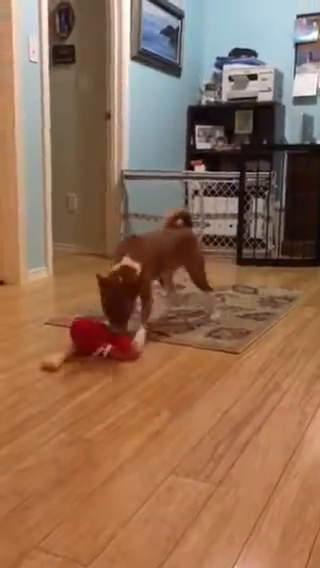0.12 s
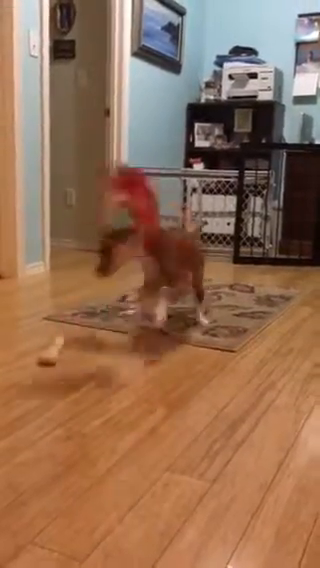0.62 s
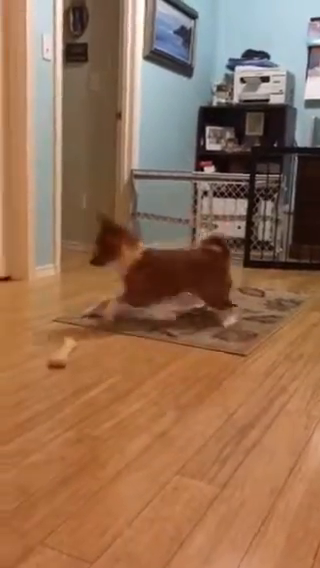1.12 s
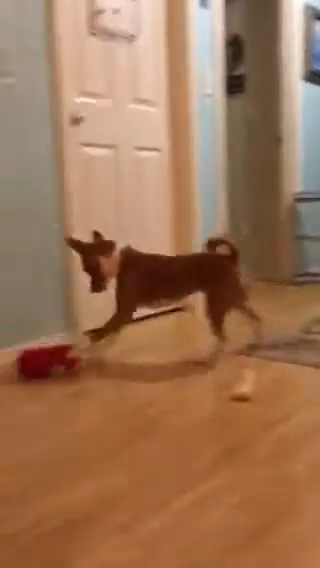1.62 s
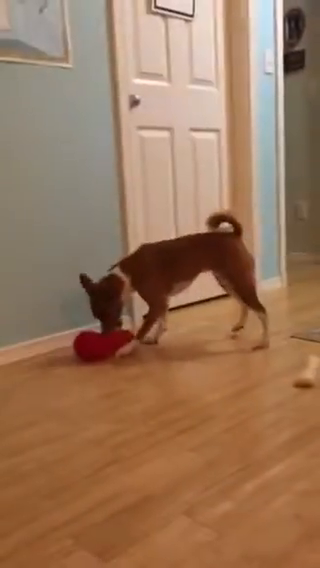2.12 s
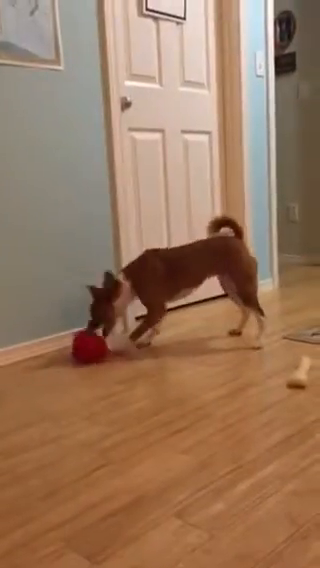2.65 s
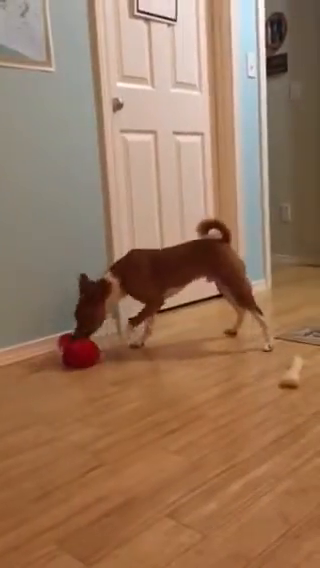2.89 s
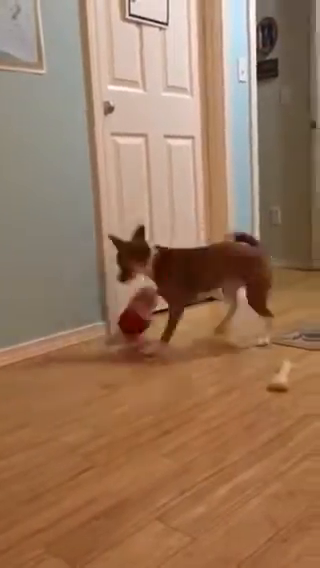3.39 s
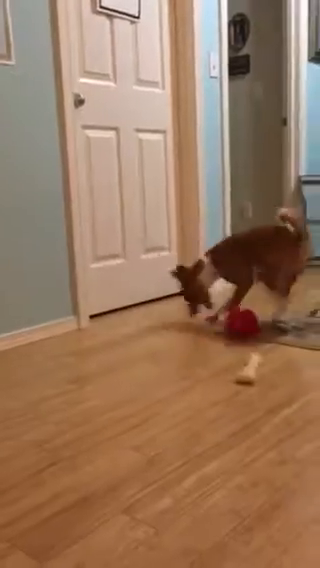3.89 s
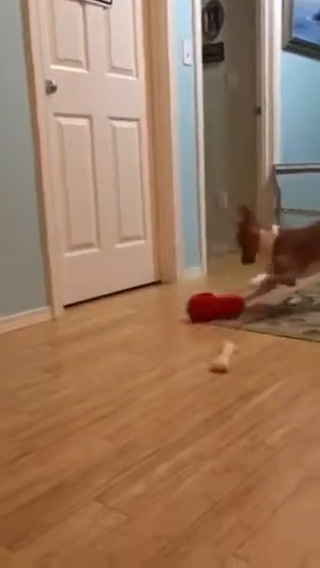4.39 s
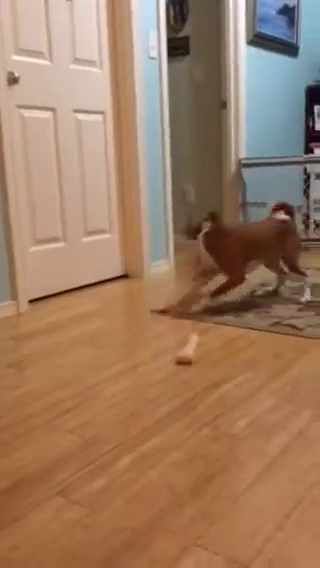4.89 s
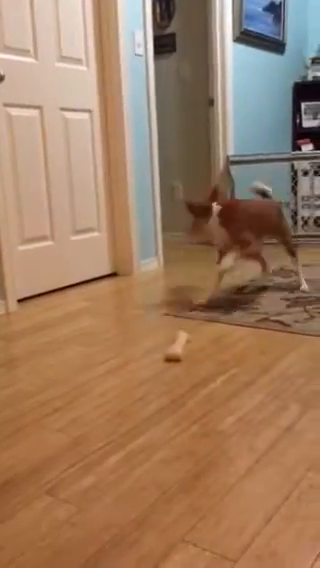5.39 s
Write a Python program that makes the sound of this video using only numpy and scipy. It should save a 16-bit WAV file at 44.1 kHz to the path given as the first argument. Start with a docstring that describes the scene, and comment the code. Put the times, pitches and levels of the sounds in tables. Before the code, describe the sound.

A dog tosses a soft toy on a laminate floor, heard by a phone a few metres away. Scattered claw ticks and dull thumps open the scene, low booms follow around 1.4 seconds, then a quiet lull. A loud burst of sharp clicks, thuds and scuffing comes just after three seconds, thinning into sparse taps and soft bumps. The bare room adds a bright short tail; faint hiss and low hum sit behind.

```python
"""Claws of a dog tick on a laminate floor as it tosses a soft toy about, a few metres from a phone.
Each tick is bright scattered noise with a brief ring, and the bare room's hard walls stretch its tail.
Pads and toy thump into decaying low floor modes; paws and plush scuff along as swelling grainy noise.
Small hollow plops are short wobbly tones. Behind it all lie shaped-noise hiss and a wavering hum."""
import sys
import numpy as np
from scipy import signal
from scipy.fft import rfft, irfft
from scipy.io import wavfile
from scipy.ndimage import uniform_filter1d

SR = 44100
rng = np.random.default_rng(int(sys.argv[2]) if len(sys.argv) > 2 else 0)


def boost(x):
    """Linear amplitude factor 10**(x/20) for a level x in decibels (scalar or array-like)."""
    u = np.asarray(x, float) / 20
    return 10 ** u


def transcribe(u):
    """Save the signal u as a 16-bit wav file named by the first command-line argument.

    u: samples, shape (n,) or (channels, n), limited to [-1, 1]; the rate is SR.
    q: integer samples, one column per channel.
    """
    v = np.clip(np.atleast_2d(u).T, -1, 1)
    q = np.round(v * 32767).astype(np.int16)
    wavfile.write(sys.argv[1], SR, q)


N = 243873  # length in samples

# Claw ticks. Each row: time in seconds, nominal peak in dB, centre of the bright hump in Hz,
# treble lift above 4 kHz in dB per octave, room tail lift in dB.
CLAW_TICKS = [(0.212, -54, 7500, 11, -6), (0.343, -37.5, 2500, 1, 0.5), (0.3494, -34, 4260, 10, -10),
              (0.5272, -37, 1650, 20, -15.5), (0.6483, -36, 2500, -6, -10), (0.6519, -19, 1970, 2.5, -0.5),
              (0.6564, -20.5, 6380, 15, -2), (0.677, -25.5, 1740, -2, 2.5), (0.7862, -38, 1730, 22, 4),
              (0.885, -30, 2220, -12, 1), (0.8892, -28.5, 4560, 7, -1), (1.1527, -30, 2520, -12, -4),
              (1.1565, -27.5, 4360, 2.5, -2), (1.3782, -32.5, 2950, 7.5, 6.5), (1.536, -34.5, 4700, 3, 7),
              (1.605, -30.5, 5750, 13, -3), (1.7431, -42, 2160, 2, 6.5), (1.7825, -34, 4260, 1.5, -4.5),
              (1.86, -34, 3590, 4, -4.5), (2.0073, -43.5, 4000, -16, -4), (2.0364, -45.5, 1580, 2.5, 4),
              (2.311, -37, 2140, 5.5, 5.5), (2.5868, -44.5, 2500, -7, 7), (2.608, -28, 4160, 7.5, -4),
              (2.7095, -43, 2360, 15, 2), (2.8229, -43.5, 2500, 6, 4), (2.856, -41.5, 3400, 4, -2),
              (3.042, -19.5, 2476, 4, -3.5), (3.164, -54, 3000, -17, -18), (3.272, -30.5, 3420, 2, -17),
              (3.3006, -13.5, 4660, -2.5, -2), (3.309, -19, 6150, 4, -3.5), (3.3603, -18, 1670, 0.5, -3),
              (3.4187, -20, 2550, 5, 1.5), (3.5607, -14.5, 1750, 3.5, -1), (3.6388, -14.5, 3100, 0, 0),
              (3.714, -40, 9000, 13, -8), (3.7233, -33, 6500, 0, -6), (3.8366, -29, 3000, -7, 1),
              (3.976, -21, 2300, 2, 1.5), (3.9848, -22, 2380, 5, -3.5), (4.095, -40, 9000, 27.5, -8),
              (4.2257, -31.5, 2800, 3.5, 2.5), (4.2327, -35, 2330, 0, 2), (4.4597, -32, 1830, -4.5, 1.5),
              (4.527, -39.5, 2790, 2, 9), (4.7274, -31, 2760, 5.5, 3), (4.734, -33, 5830, 4, -10),
              (4.836, -41, 4200, 8, 6), (5.0662, -44, 1620, 1.5, 13.5), (5.448, -45.5, 2510, -12.5, 4.5)]
# Neighbouring claws landing just after. Each row: time of the tick in seconds, delay in ms,
# strength of the second click as a share of the first (0-1).
DOUBLED_TICKS = [(2.3116, 1.35, 0.55), (3.042, 0.468, 0.95), (3.042, 0.975, 0.45)]
# Room's answer to a tick: first arrivals, wall echo, diffuse tail. Each row: delay in ms, level in dB
# before the decay.
TICK_ARRIVALS = [(0, -27), (.6, -7.5), (4, -3), (6.5, -14.5), (8.5, -17.5), (10, -12.5), (14, -13),
                 (18, -13.5), (24, -12.5)]
# Decay of the room by pitch. Each row: frequency in Hz, t60 in seconds.
ROOM_DECAY = [(300, 0.55), (1000, 0.85), (2500, 0.53), (6000, 0.5), (13000, 0.26)]
# Colour shared by all ticks at the phone. Each row: frequency in Hz, relative level in dB per Hz.
TICK_COLOUR = [(290, -27), (500, -10), (795, -25.5), (893, -4), (1140, -4), (1640, -3), (2500, 0.5),
               (2980, -4), (3440, 1), (4400, 0), (4940, -2), (6060, -0.5), (10400, -9), (11800, -8.5),
               (16000, -19)]
HUMP_DB, HUMP_DB_PER_OCTAVE = 4, -1.5  # hump height at 2.5 kHz; higher humps are flatter
CREST_DB = 9.5  # nominal peak of a tick over its first scatter
# A bare wall throws the treble back as a snap; later the tail is duller (snap and dulling as shares).
ECHO_MS, ECHO_WIDTH_MS, ECHO_SNAP, TAIL_DULL = 9.4, 0.43, 0.74, 0.23
# Separate early reflections merge into the tail: rate, decay of each, depth, fade of that depth.
FACETS_PER_S, FACET_MS, FACET_SHARE, FACETS_FADE_MS = 700, 0.68, 0.36, 14

# Pad and toy landings. Each row: time in seconds, peak of the boom in dB, favoured floor pitch in Hz,
# knock level in dB relative to the boom, level of modes far from that pitch in dB.
LANDINGS = [(0.019, -49, 91, -19, -20.5), (0.341, -47, 70.6, -23.5, -13), (0.499, -48, 179, -19, -13),
            (0.549, -43.5, 62.6, -18.5, -9), (0.665, -35, 57.6, -8.5, -5.5), (0.701, -40, 90, -19, -12),
            (0.892, -34.5, 220, -15.5, -14), (0.916, -33, 111, -24, -6.5), (0.949, -32.5, 95, -42, -7.5),
            (1.151, -56, 86, -14, -9), (1.289, -38, 102, -19, -26), (1.381, -22, 108, -28.5, -24.5),
            (1.412, -23, 104, -31, -18), (1.488, -31, 98, -40.5, -16.5), (1.54, -39, 96, -30, -16),
            (1.597, -29.5, 94.5, -38, -34), (1.63, -52, 100, -15, -11), (1.743, -33.5, 97, -50, -14),
            (1.854, -53, 99.7, -22, -17), (3.057, -39.5, 106, -39, -14.5), (3.307, -31.5, 58, -22, -8),
            (3.359, -27.5, 115, -12, 4), (3.407, -22.5, 132, -23, -20), (3.447, -31.5, 145, -26, -6),
            (3.561, -24, 100, -24.5, -4.5), (3.62, -34.5, 140, -39, -21), (3.659, -35.5, 81, -38.5, -8.5),
            (3.839, -50.5, 118, -26, -12.5), (3.974, -34.5, 132, -15.5, -5.5),
            (4.229, -51.5, 51, -15, -26.5), (4.373, -52, 117, -5.5, -4), (4.727, -34.5, 102, -25.5, 0),
            (4.952, -37.5, 104, -23, -7), (5.063, -37, 103, -14, -10.5), (5.168, -45, 105, -11, -15),
            (5.272, -38.5, 104, -18.5, -10)]
# Floor and room modes. Each row: nominal frequency in Hz, relative level in dB,
# t60 in seconds before the landing scales it.
FLOOR_MODES = [(48.2, 1, 0.35), (67.1, 2, 0.47), (83.8, -1, 0.41), (100.74, 2, 0.51), (130, 2, 0.39),
               (159.1, -5.5, 0.43), (203.7, -0.5, 0.33), (237.6, -3, 0.33), (285.6, -1, 0.52),
               (355.4, -6, 0.33), (406.7, -11, 0.28), (570, -13, 0.29), (649.6, -14, 0.39)]
# Share of the t60 left is RING_HARD less RING_PER_DB per dB of knock: softer landings ring longer.
RING_HARD, RING_PER_DB = 0.61, 0.0065

# Strokes of sliding paws and dragged or shaken plush. Each row: time of the top in seconds, level in dB,
# seconds to climb 20 dB, treble tilt in dB per two octaves about 2 kHz, sizzle in dB.
SCUFF_STROKES = [(0.0, -60, .1, -11, 6), (0.528, -51, 0.19, -3.5, -1), (.83, -50, 0.2, 0, -5.5),
                 (1.38, -53, 0.4, -3.5, -6), (1.93, -62.5, 4.7, 0, -3), (2.551, -67, 0.4, 5, -4),
                 (2.96, -57.5, 0.33, -0.5, 2), (3.24, -54.5, 0.1, 12, 4), (3.34, -46, 0.07, -1, -13.5),
                 (3.48, -43.5, 0.7, -2, -3), (3.7, -41.5, 0.05, 3, 5), (3.96, -52, 0.5, 2.5, -12),
                 (4.26, -51, 0.7, 3, 3.5), (4.96, -51.5, 0, 1.5, -6), (5.12, -53.5, 0.26, 9, 16),
                 (5.22, -49, 0.05, -3.5, -2.5), (5.45, -56, 5, -5.5, -2)]
# Colour of the rubbing. Each row: frequency in Hz, relative level in dB per Hz.
RUB_COLOUR = [(180, 2), (300, 3), (470, -44), (645, -11), (762, -13), (1870, -11), (2570, -13), (6000, -17),
              (16000, -29.5)]
STROKE_FADE_DB_PER_S = 70.5
# Tiny catches of claw and fabric within a stroke: rate, decay, strength.
CRACKLES_PER_S, CRACKLE_MS, CRACKLE_SHARE = 65, 0.78, 0.35

# Small hollow plops. Each row: time of the middle in seconds, nominal peak in dB, pitch in Hz,
# length at half height in ms.
HOLLOW_PLOPS = [(0.3447, -37.5, 2350, 1.81), (1.202, -46.5, 2290, 4), (1.317, -44.5, 1090, 3.9),
                (3.045, -31, 2470, 3.15), (3.583, -39.5, 6940, 3), (3.648, -36, 6200, 4.5),
                (3.661, -34, 3360, 3.5), (3.682, -34, 2450, 4), (4.309, -51.5, 1024, 9.9),
                (4.475, -49.5, 1015, 12), (5.07, -40, 357, 12.5), (5.408, -49.5, 1670, 7.4),
                (5.45, -51, 336, 10)]

# Colour of the room hiss and rumble. Each row: frequency in Hz, relative level in dB per Hz.
HISS_COLOUR = [(30, 2.5), (60, 5), (120, -2), (170, -14), (290, -13), (480, -24), (900, -26.5), (2500, -34),
               (6000, -37), (14500, -38), (16500, -67)]
HISS_DB = -62.5
HUM_HZ, HUM_WIDTH_HZ, HUM_DB = 118.7, 10, -62  # the width is that of the wavering part

# Dips of the microphone port, before a short filter smooths them.
# Each row: centre in Hz, width in Hz, gain in dB.
PORT_DIPS = [(4920, 210, -4), (10420, 240, -6.5)]
LOW_CUT_HZ = 42


def evened(x):
    """Scales to rms 1."""
    return x / np.sqrt(np.mean(x ** 2) + 1e-20)


def read(points, hz):
    """Reads a table on a log-frequency axis."""
    f, value = np.transpose(points)
    return np.interp(np.log(hz + 1), np.log(f + 1), value)


def add(mix, s, sound):
    """Mixes a sound in at time s."""
    part = mix[max(round(s * SR), 0):][:len(sound)]
    part += sound[:len(part)]


def shaped_noise(length, db_of, size=256, patchy_db=0):
    """Random short-time spectra whose level is db_of(hz, t), with drifting patches."""
    hop = size // 4
    frames = length // hop + 5
    hz = np.fft.rfftfreq(size, 1 / SR)[:, None]
    t = np.arange(frames)[None] * hop / SR
    real, imaginary, patches = rng.standard_normal((frames, len(hz), 3)).T
    patches = uniform_filter1d(patches, size=6, axis=0)
    patches = evened(uniform_filter1d(patches, size=14, axis=1))
    spectra = (real + 1j * imaginary) * boost(db_of(hz, t) + patchy_db * patches)
    return signal.istft(spectra, nperseg=size, noverlap=size - hop)[1][:length]


def tick(s, peak_db, hz, treble_db, tail_db):
    """A claw click with a bright hump, scattered by boards and walls; the board rings briefly at the hump."""
    length = SR * 3 // 5
    t_ms = np.arange(length) * 1000 / SR
    hump_db = HUMP_DB + HUMP_DB_PER_OCTAVE * np.log2(hz / 2500)

    def colour(f, t):
        octaves = np.log2((f + 1) / hz)
        hump = hump_db * np.exp(-octaves ** 2 / 0.6)
        tilt = treble_db * np.clip(np.log2((f + 1) / 4000), 0, 1.4)
        return read(TICK_COLOUR, f) + hump + tilt - 60 * t / read(ROOM_DECAY, f)

    sound = shaped_noise(length, colour, patchy_db=1.4)
    first = np.clip((7 - t_ms) / 2, 0, 1)  # weight of the first arrivals, gone by 7 ms
    # along the floor the first arrivals lose treble
    dull = signal.lfilter(*signal.butter(2, 5500, fs=SR), sound)
    sound = sound + .5 * first * (dull - sound)
    snap = ECHO_SNAP * np.exp(-((t_ms - ECHO_MS) / ECHO_WIDTH_MS) ** 2)
    snap = snap - TAIL_DULL * np.clip((t_ms - 12) / 4, 0, 1)
    sound = sound + snap * (sound - dull)
    ring = np.sin(2 * np.pi * hz * t_ms / 1000) * boost(hump_db - 9) * first
    # early reflections come as separate snaps
    facets = (rng.random(length) < FACETS_PER_S / SR) * rng.exponential(1, length)
    facets = signal.lfilter([1], [1, -np.exp(-1000 / SR / FACET_MS)], facets)
    depth = FACET_SHARE * np.exp(-t_ms / FACETS_FADE_MS) * (1 - .5 * first)
    sound = sound / np.std(sound[:1500])
    sound = sound * (1 - depth + depth * evened(facets)) + ring
    arrival_ms, arrival_db = np.transpose(TICK_ARRIVALS)
    sound *= boost(np.interp(t_ms, arrival_ms, arrival_db) + tail_db * (1 - first))
    # the direct click stands out of the scatter
    sound *= 1 + 1.2 * np.exp(-((t_ms - 1.4) / 0.4) ** 2)
    for at, delay_ms, share in DOUBLED_TICKS:
        if abs(at - s) < .003:
            lag = np.exp(-2j * np.pi * np.fft.rfftfreq(length, 1 / SR) * delay_ms / 1000)
            sound = irfft(rfft(sound) * (1 + share * lag), length) / np.sqrt(1 + share ** 2)
    return s - .0005, boost(peak_db - CREST_DB) * sound


def thump(s, peak_db, hz, knock_db, far_db):
    """A soft landing rings the floor modes nearest its pitch most, with a dull knock on top."""
    t = np.arange(SR * 3 // 4) / SR
    f, db, t60 = np.transpose(FLOOR_MODES)[:, :, None]
    near_db = far_db * (1 - np.exp(-np.log2(f / hz) ** 2 / 0.26))
    ring = max(RING_HARD - RING_PER_DB * knock_db, .2)
    # each landing detunes the modes slightly and starts them at its own phases
    luck = rng.random((len(FLOOR_MODES), 2))
    cycles = f * (.98 + 0.035 * luck[:, :1]) * t + 0.34 * luck[:, 1:]
    modes = boost(db + near_db - 60 * t / (t60 * ring)) * np.sin(2 * np.pi * cycles)
    # the weight shifts on the boards
    shift = evened(uniform_filter1d(rng.standard_normal(modes.shape), size=1500, axis=1))
    boom = (modes * boost(2.93 * shift)).sum(0)
    boom = boom * (1 - np.exp(-t / 0.005))  # the pad sinks in, so the bass swells

    def knock_colour(f, t):
        return -7 * np.log2((f + 1) / 480) ** 2 - 60 * t / .5

    knock = shaped_noise(len(t), knock_colour, size=512)
    knock = knock / np.std(knock[:1300]) * (1 - np.exp(-t / 0.0046))
    return s - .004, boost(peak_db) * (boom / abs(boom).max() + boost(knock_db) * knock)


def scuff():
    """Grainy rubbing noise in strokes that swell and fade, each with its own treble and plush sizzle near 6 kHz."""
    top_s, level_db, climb_s, treble_db, sizzle_db = np.transpose(SCUFF_STROKES)[:, :, None]
    s = np.arange(0, N / SR + .1, .004)
    climb_db = 20 * (top_s - s) / np.maximum(climb_s, .01)
    fade_db = STROKE_FADE_DB_PER_S * (s - top_s)
    power = boost(level_db - np.where(s < top_s, climb_db, fade_db)) ** 2
    share = power / power.sum(0)  # the loudest stroke sets the colour

    def colour(f, t):
        tilt = np.interp(t, s, (share * treble_db).sum(0))
        tilt = tilt * np.clip(np.log2((f + 1) / 2000) / 2, -1, 1.5)
        sizzle = np.interp(t, s, (share * sizzle_db).sum(0))
        sizzle = sizzle * np.exp(-np.log2((f + 1) / 5900) ** 2 / 0.06)
        return read(RUB_COLOUR, f) + tilt + sizzle

    grain = evened(uniform_filter1d(rng.standard_normal(N), 300))
    rub = evened(shaped_noise(N, colour, patchy_db=1.8))
    catches = rng.exponential(1, N) * (rng.random(N) < CRACKLES_PER_S / SR)
    catch_decay = np.exp(-np.arange(400) / SR * 1000 / CRACKLE_MS)
    crackle = signal.oaconvolve(catches, catch_decay)[:N]
    rub = evened(rub * (1 + CRACKLE_SHARE * crackle))
    swell = np.interp(np.arange(N) / SR, s, np.sqrt(power.sum(0)))
    return swell * boost(2.0 * grain) * rub


def plop(s, peak_db, hz, length_ms):
    """A few wobbly cycles under a smooth hump, smeared by a short scatter."""
    t = np.arange(round(2 * length_ms * SR / 1000)) / SR
    wobble = evened(uniform_filter1d(rng.standard_normal(len(t)), size=100))
    warped_s = np.cumsum(1 + .05 * wobble) / SR
    blip = np.sin(2 * np.pi * hz * warped_s) * np.hanning(len(t))
    smear = rng.standard_normal(SR // 8) * boost(-35 - 300 * np.arange(SR // 8) / SR)
    smear[0] = 1  # the direct sound
    return s - t[-1] / 2, boost(peak_db) * signal.oaconvolve(blip, smear)


def background():
    """Room hiss and rumble as shaped noise, and a hum of a steady tone plus narrow noise that makes it waver."""
    hiss = evened(shaped_noise(N, lambda f, t: read(HISS_COLOUR, f) + 0 * t, size=2048))
    f = np.fft.rfftfreq(N, 1 / SR)
    resonance = 1 / (1 + ((f - HUM_HZ) / HUM_WIDTH_HZ) ** 2)
    waver = evened(irfft(rfft(rng.standard_normal(N)) * resonance, N))
    steady = np.sqrt(2) * np.sin(2 * np.pi * HUM_HZ * np.arange(N) / SR)
    return boost(HISS_DB) * hiss + boost(HUM_DB) * evened(steady + 0.33 * waver)


def scene():
    """All sources as they reach the phone."""
    mix = background() + scuff()
    for source, rows in ((tick, CLAW_TICKS), (thump, LANDINGS), (plop, HOLLOW_PLOPS)):
        for row in rows:
            add(mix, *source(*row))
    return mix[None]


def low_pass(x):
    """Removes everything above the highest recorded frequency."""
    return signal.sosfilt(signal.butter(12, 15950, fs=SR, output="sos"), x)


def record(dry):
    """The phone's microphone cuts the bass, and its port dips the treble at a few pitches."""
    f = np.linspace(0, SR / 2, 257)
    dips_db = sum(db * np.exp(-((f - hz) / width) ** 2) for hz, width, db in PORT_DIPS)
    port = signal.firwin2(255, f, boost(dips_db), fs=SR)
    low_cut = signal.butter(5, LOW_CUT_HZ, "highpass", fs=SR, output="sos")
    mix = signal.oaconvolve(signal.sosfilt(low_cut, dry), port[None], "same")
    return low_pass(mix)


dry = scene()
out = record(dry)
transcribe(out)
```